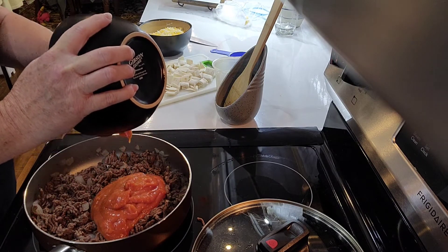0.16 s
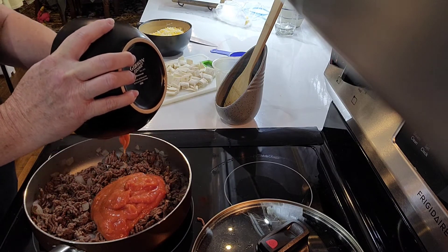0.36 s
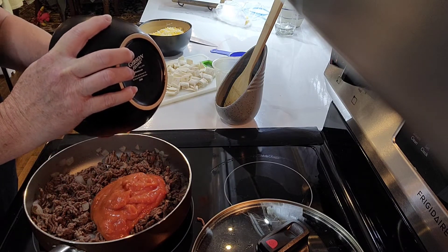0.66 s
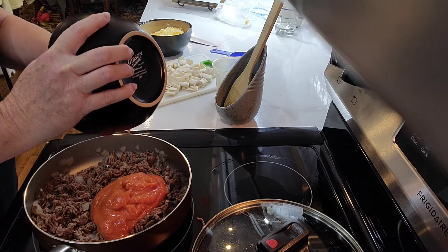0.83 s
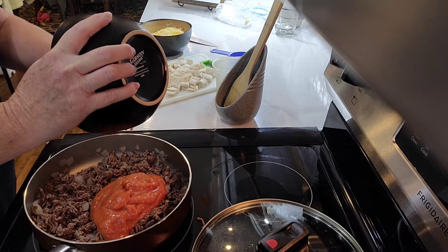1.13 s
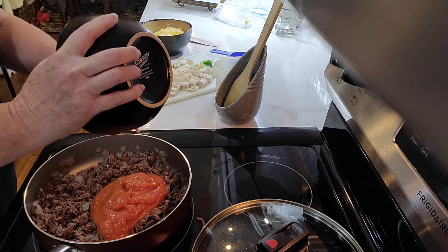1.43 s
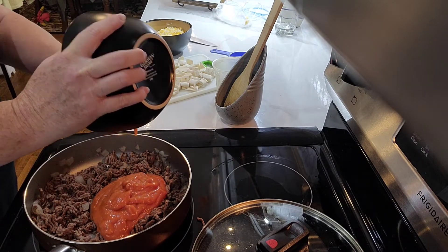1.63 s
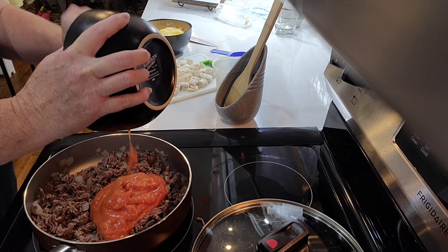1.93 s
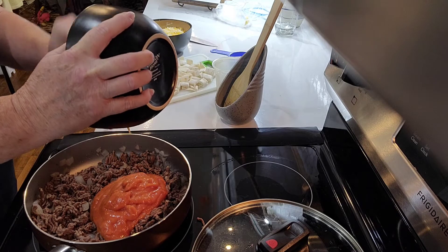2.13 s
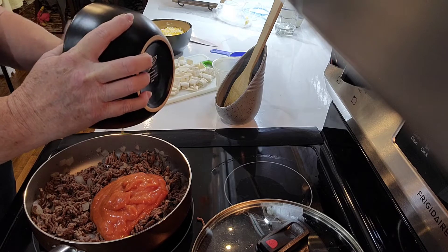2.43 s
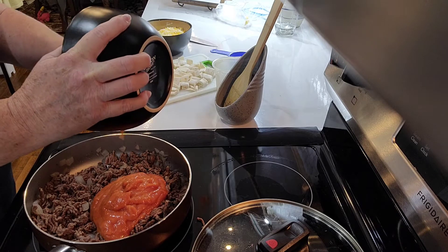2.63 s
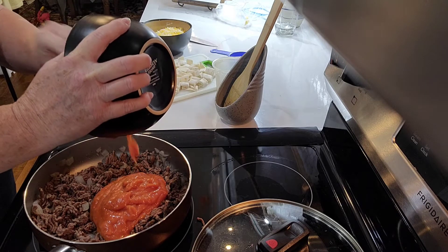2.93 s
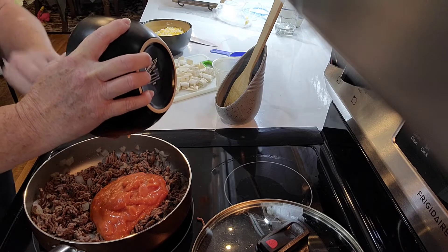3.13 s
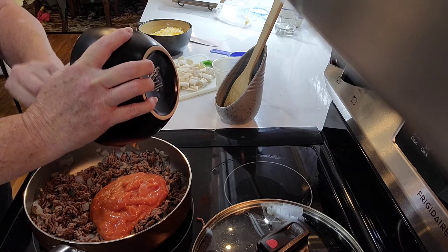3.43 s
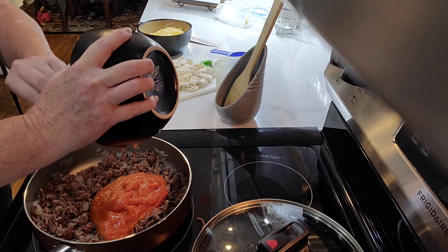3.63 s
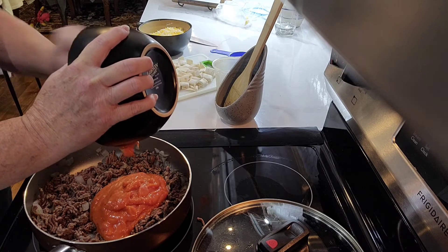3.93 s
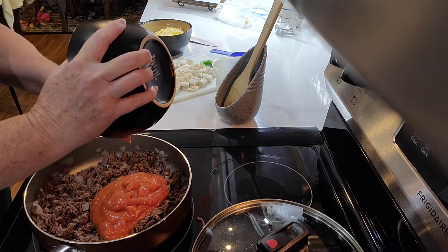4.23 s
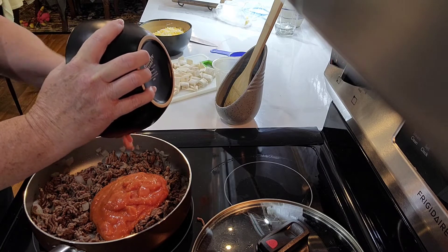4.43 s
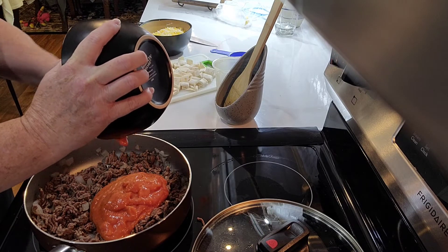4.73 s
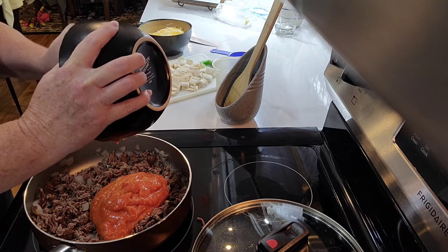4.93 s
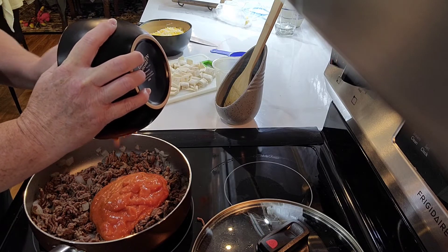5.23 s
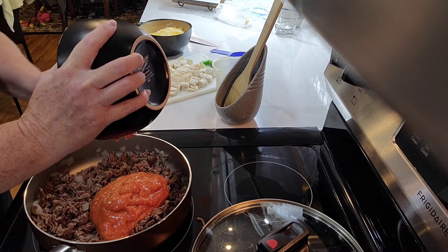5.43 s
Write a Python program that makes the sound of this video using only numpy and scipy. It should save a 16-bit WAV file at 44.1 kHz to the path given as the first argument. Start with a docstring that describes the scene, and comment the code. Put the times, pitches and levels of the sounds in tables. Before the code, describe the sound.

Close stereo sound of a spoon working inside a hollow ceramic pot. Quick scratchy drags, some chirping or squeaking, come between hard wall clacks and brighter bottom clinks. The first half is busy and uneven; later strokes fall roughly three times a second, and two loud knocks come near five seconds. A short kitchen reverberation follows each contact over very low, constant hiss.

```python
"""A short scrape already under way opens the scene, over a faint steady hiss: a spoon in a glazed pot.
Knocks on the pot's wall or bottom follow, among further drags along the glaze that hiss or squeak.
Drags are sliding tones over grainy noise; knocks are decaying pot modes plus a burst of noise.
A hard kitchen answers both with a short tail of decaying noise; knocks towards the bottom also flutter.
The pot is held tilted over a stove while the spoon scrapes thick sauce out of it."""
import sys
import numpy as np
from scipy import signal
from scipy.fft import rfft, irfft, next_fast_len
from scipy.io import wavfile
from scipy.ndimage import map_coordinates

SR = 44100
rng = np.random.default_rng(int(sys.argv[2]) if len(sys.argv) > 2 else 0)


def dump(signal):
    """Clip the signal to [-1, 1] and save it as 16-bit WAV at the path in sys.argv[1]."""
    limited = np.clip(np.atleast_2d(signal).T, -1, 1)
    pcm = np.round(limited * 32767).astype(np.int16)
    wavfile.write(sys.argv[1], SR, pcm)


N = 245637


def amp(db):
    """Decibels to gain."""
    return 10 ** (np.asarray(db) / 20)


def unit(x):
    """Scale to rms 1."""
    return x / np.sqrt(np.mean(x ** 2) + 1e-20)


def fade(t, t60):
    """Exponential decay, 60 dB down after t60 seconds."""
    return np.exp(-np.log(1000) * t / np.maximum(t60, 1e-3))


def along(points, hz):
    """Read (frequency, value) points on a log-frequency axis."""
    point_hz, values = np.transpose(points)
    return np.interp(np.log(hz + 1), np.log(point_hz + 1), values)


def wobble(rate, n):
    """A smooth random curve of n samples, rate knots a second."""
    knots = rng.standard_normal(int(n * rate / SR) + 4)
    return map_coordinates(knots, [np.arange(n) * rate / SR])


def filtered(x, response):
    """Multiply the spectrum of x by a response of frequency."""
    n = x.shape[-1]
    m = next_fast_len(n + 4096)
    hz = np.fft.rfftfreq(m, 1 / SR)
    return irfft(rfft(x, m) * response(hz), m)[..., :n]


def half_angle(alike, hz):
    """Half the left-right phase angle whose cosine is the likeness of the two sides."""
    return np.arccos(np.clip(along(alike, hz), -1, 1)) / 2


def spread(pair, spectrum, alike):
    """Colour two unrelated signals and mix them to left and right, at rms 1."""
    def middle_and_side(hz):
        turn = half_angle(alike, hz)
        return amp(along(spectrum, hz)) * [np.cos(turn), np.sin(turn)]
    mid, side = filtered(pair, middle_and_side)
    return unit(np.array([mid + side, mid - side]))


def panned(x, db):
    """Make the left side db louder than the right."""
    return x * amp([[db / 2], [-db / 2]])


def add(track, s, x):
    """Mix x into track from time s."""
    i = round(s * SR)
    x = x[:, max(-i, 0):N - i]
    track[:, max(i, 0):][:, :x.shape[1]] += x


# colour of the steady hiss: (pitch_hz, density_db per Hz, relative)
HISS_COLOUR = [(15, -40), (25, -7.5), (326, -5), (659, -4.5), (1330, -1.5), (1840, -2.5), (3080, 2.5),
               (4140, -3), (4870, 1.5), (5880, -3.5), (7310, -4.5), (9320, 0), (11900, -9), (14800, -0.5),
               (16000, -45)]
# how alike the hiss is on the two sides: (pitch_hz, likeness -1 to 1)
HISS_LIKENESS = [(60, 0.12), (180, 0.88), (550, 0.72), (1650, 0.21), (4970, -0.068), (15000, 0.2)]


def background():
    """Kitchen hiss: coloured noise with a fine wavering level, over a narrow low hum of filtered noise."""
    wavering = rng.standard_normal((2, N)) * amp(0.28 * wobble(1300, N))
    hiss = spread(wavering, HISS_COLOUR, HISS_LIKENESS)
    hum_colour = [(150, -51), (280, -49), (335, -22), (400, -35), (700, -103)]  # (pitch_hz, density_db)
    hum = spread(rng.standard_normal((2, N)), hum_colour, [(300, 0.98)])
    return amp(-58.0) * hiss + amp(-77.5) * hum


# colour of the grainy rasp: (pitch_hz, density_db per Hz, relative)
RASP_COLOUR = [(350, -57), (600, -26), (768, -12), (944, -76), (1210, -17), (2240, -30), (3160, -14.5),
               (4520, -5), (5120, -1.5), (6290, -23), (7310, -6), (10700, -21.5), (13200, -10.5),
               (16000, -32)]
# how alike spoon sounds are on the two sides: (pitch_hz, likeness -1 to 1)
SPOON_LIKENESS = [(400, 0.88), (1200, 0.86), (2600, 0.59), (4800, -0.49), (7500, 0.18), (14000, -0.14)]


def drag(start, crest, end, from_hz, to_hz, squeak_db, half_db, rasp_db):
    """The spoon sticks and slips: a rough gliding squeak with its octave and half pitch, over a grainy rasp."""
    n = int((end - start) * SR)
    t = start + np.arange(n) / SR
    pressure = np.interp(t, [start, crest, end], [0, 1, 0])
    slips = unit(amp(2.6 * wobble(170, n)))
    pitch = np.linspace(from_hz, to_hz, n) * (1 + .012 * wobble(200, n))
    phase = 2 * np.pi * np.cumsum(pitch) / SR + np.array([[.6], [-.6]])  # left leads right

    # uneven slips smear the squeak into a narrow band with wide skirts
    def smear(rate):
        return wobble(rate, n) + 1j * wobble(rate, n)
    core = .68 + .46 * smear(260)
    skirts = .18 * smear(1300)
    tone_and_octave = np.exp(1j * phase) + amp(-13) * np.exp(2j * phase)
    squeak = amp(squeak_db) * (core + skirts) * tone_and_octave
    groan = amp(half_db) * core * np.exp(.5j * phase)
    grains = rng.standard_normal((2, n)) * amp(4.5 * wobble(2500, n))
    rasp = amp(rasp_db - 7.5) * spread(grains, RASP_COLOUR, SPOON_LIKENESS)
    return pressure * slips * (1.156 * np.real(squeak + groan) + rasp)


def detuned_db(hz, centre_hz, reach_hz):
    """Loss away from a resonance: 1 dB at reach_hz, growing with the square of the distance."""
    return -((hz - centre_hz) / reach_hz) ** 2


CREST_SHARE = 0.57  # how far into a drag the pressure peaks
# a squeak on this wall mode also wakes the next one up
TWIN_NEAR_HZ, TWIN_RATIO, TWIN_DB, TWIN_REACH_HZ = 2510, 1.22, 1.5, 44.8
# the half pitch speaks when it falls near a low wall mode
HALF_NEAR_HZ, HALF_DB, HALF_REACH_HZ = 1695, -4.5, 50
SILENT_DB = -120


def stroke(start, end, from_hz, to_hz, squeak_db, rasp_db):
    """One drag; its pitch sets how strongly the pot adds a half pitch below and a twin squeak above."""
    crest = start + CREST_SHARE * (end - start)
    hz = (from_hz + to_hz) / 2
    half_db = squeak_db + HALF_DB + detuned_db(hz / 2, HALF_NEAR_HZ, HALF_REACH_HZ)
    twin_db = squeak_db + TWIN_DB + detuned_db(hz, TWIN_NEAR_HZ, TWIN_REACH_HZ)
    main = drag(start, crest, end, from_hz, to_hz, squeak_db, half_db, rasp_db)
    twin = drag(start, crest, end, TWIN_RATIO * from_hz, TWIN_RATIO * to_hz, twin_db, SILENT_DB, SILENT_DB)
    return main + twin


# modes of the pot, strengths relative: (pitch_hz, width_hz, wall_db, bottom_db)
POT_MODES = [ (766.3, 47, -37.5, -10), (1051, 17, -19.5, -40), (1203.4, 26, -13.5, -43),
             (1432, 92, -14, -13), (1735, 77, -18, -21), (1866, 52, -10.5, -20), (2550, 200, -11, -46),
             (2749, 54, -14.5, -37), (3111, 134, -17, -0.5), (3490, 75, -18, -4), (3660, 115, -5, -10),
             (4420, 72, -15, -19), (4674, 75, -6, -29), (4837, 94, -11, 1), (4901, 46, -12.5, -2),
             (5120, 120, -12, -4), (7070, 33, -20, -29), (7370, 59, -29, -6), (8030, 76, -12.5, -19),
             (8710, 90, -18, -17), (9725, 95, -13, -19), (10300, 55, -20, -23), (11530, 39, -15, -18.5),
             (12300, 160, -8.5, -9), (12900, 120, -17, -13), (13200, 120, -12, -5)]


def through_pot(x, gain_db):
    """A drag also sets the wall's modes ringing: a bank of resonances added to the direct sound."""
    def modes(f):
        return sum(amp(wall_db) * 1j * f * width / (hz * hz - f * f + 1j * f * width)
                   for hz, width, wall_db, _ in POT_MODES)
    with_room_to_ring = np.pad(x, ((0, 0), (0, SR // 20)))
    return filtered(with_room_to_ring, lambda f: 1 + amp(gain_db) * modes(f))


# length of the room's tail: (pitch_hz, t60_s)
KITCHEN_T60 = [(300, 0.17), (1200, 0.37), (3000, 0.29), (5000, 0.26), (9000, 0.29), (15000, 0.2)]
# colour of the room's tail: (pitch_hz, gain_db)
KITCHEN_COLOUR = [(400, 4), (1100, 1.5), (1900, 0), (2750, 7), (3900, 0.5), (4850, 7), (6000, 1),
                  (7500, 1.5), (13000, 3.5)]


def kitchen(x):
    """Diffuse answer of the room: decaying coloured noise, drawn anew for each contact, convolved with x."""
    hz, t, z = signal.stft(rng.standard_normal((2, SR // 2)), SR, nperseg=256)
    build_up = 1 - np.exp(-t / 0.00067)
    shaped = z * fade(t, along(KITCHEN_T60, hz)[:, None]) * build_up
    tail = signal.istft(shaped, SR, nperseg=256)[1]
    tail = filtered(tail / np.linalg.norm(tail[0]), lambda f: amp(along(KITCHEN_COLOUR, f)))
    return signal.fftconvolve(x, tail, axes=1)


# drags along the glaze, levels before pressure, pot and pan:
# (start_s, end_s, start_pitch_hz, end_pitch_hz, squeak_db, rasp_db)
GLAZE_DRAGS = [ (-0.06, 0.057, 3150, 3200, -58, -45), (0.036, 0.107, 4160, 4400, -64, -41.5),
               (0.326, 0.392, 4200, 5110, -57, -41.5), (0.908, 1.001, 3300, 3100, -71, -49.5),
               (1.301, 1.371, 2690, 3520, -56, -48), (1.35, 1.396, 1880, 2454, -54.5, -47),
               (1.646, 1.737, 2440, 2964, -43.5, -47), (2.035, 2.132, 3700, 2430, -55, -47.5),
               (2.101, 2.126, 2930, 2820, -33.5, -47.5), (2.348, 2.431, 5400, 4350, -55, -38.5),
               (2.614, 2.697, 5300, 3660, -68, -40.5), (2.886, 2.943, 3400, 3000, -57, -60),
               (3.174, 3.237, 2500, 2652, -45.5, -52), (3.481, 3.54, 2470, 2650, -44.5, -48),
               (3.746, 3.825, 2570, 2510, -47.5, -52), (3.818, 3.896, 2640, 2366, -52.5, -51),
               (3.865, 3.899, 3570, 3140, -48.5, -48), (4.188, 4.268, 3235, 3350, -49.5, -51),
               (4.497, 4.587, 2680, 2470, -46.5, -48), (4.805, 4.852, 3420, 3340, -55, -45),
               (5.11, 5.19, 2900, 3170, -49.5, -44), (5.424, 5.53, 3660, 3017, -50, -51)]


def drags():
    """All drags: friction sound coloured by the pot, each with the room's answer."""
    out = np.zeros((2, N))
    for row in GLAZE_DRAGS:
        x = amp(1.0) * panned(through_pot(stroke(*row), gain_db=13.0), db=2.5)
        add(out, row[0], x)
        add(out, row[0], amp(-11.5) * kitchen(x))
    return out


def ring(t, depth, tonk_hz, tonk_db, free_db, free_t60):
    """The pot's modes at new strengths: damped under the spoon, then ringing on faintly."""
    hz, width, wall_db, bottom_db = np.transpose(POT_MODES)[:, :, None]
    size, phase, lead, load = rng.standard_normal((4, len(POT_MODES), 1))
    scatter = amp(3 * size)
    # a blow favours the low mode whose antinode it lands on
    favoured = amp(tonk_db * np.exp(-((hz - tonk_hz) / 100) ** 2))
    by_place = (1 - depth) * amp(wall_db) + depth * amp(bottom_db)
    strength = scatter * favoured * by_place * np.sqrt(width)
    damped = np.exp(-np.pi * width * t)
    free = amp(free_db) * fade(t, free_t60 * (hz / 1000) ** -.6)  # free_t60 holds at 1 kHz
    # hand, spoon and sauce load the pot differently at each blow
    hz = hz * (1 + .008 * load)
    # each mode reaches left and right at its own phase
    lag = np.sign(lead) * half_angle(SPOON_LIKENESS, hz)

    def side(shift):
        return (strength * (damped + free) * np.sin(2 * np.pi * (hz * t + phase) + shift)).sum(0)
    return np.array([side(lag), side(-lag)])


# colour of the dense clatter of spoon and pot: (pitch_hz, density_db per Hz, relative)
CLATTER_COLOUR = [(130, -4.5), (600, -14), (1150, -3), (1800, 8), (2200, -11.5), (2700, -5), (4200, 7),
                  (4900, -34), (5500, 4), (6200, -1), (7500, -1), (12800, -10), (14500, -1.5), (16000, -14)]
# body, clack, clink and tick of a contact: (from_hz, to_hz)
CONTACT_ZONES = [(400, 2200), (2200, 4200), (4200, 6000), (6000, 16000)]


def knock(depth, tonk_hz, tonk_db, levels_db, t60, clatter_db):
    """One contact: the pot's modes plus dense decaying noise, levelled zone by zone."""
    t = np.arange(SR // 4) / SR
    pot = ring(t, depth, tonk_hz, tonk_db, free_db=-19, free_t60=0.11)
    noise = spread(rng.standard_normal((2, len(t))), CLATTER_COLOUR, SPOON_LIKENESS)
    clatter = unit(noise * fade(t, t60))
    swell = 1 - np.exp(-t / .0017)  # the sound takes a moment to leave the pot
    blow = (pot + amp(clatter_db) * clatter) * swell
    out = 0
    for zone, db in zip(CONTACT_ZONES, levels_db):
        band = signal.butter(2, zone, "band", fs=SR, output="sos")
        part = signal.sosfilt(band, blow)
        out = out + amp(db) * part / np.std(part[:, :SR // 50])  # levels hold for the first 20 ms
    return out


WALL_TONK_HZ, BOTTOM_TONK_HZ = 1137, 768  # the low mode that a blow favours
TONK_DB, TONK_GAIN = 4.5, 0.58  # lift of that mode; more dB for each dB of hollowness
WALL_CLATTER_S, BOTTOM_CLATTER_S = 0.039, 0.082  # t60 of the clatter
CLATTER_DB, CLATTER_LOSS = -4.5, 0.67  # clatter beside the modes; dB lost for each dB of hollowness
# the wall clacks, the bottom clinks; one row each for body, clack, clink and tick: (wall_db, bottom_db)
PLACE_WEIGHTS = [(-7.5, -6.5), (1, 1), (-1, 11.5), (1.5, 6.5)]


def strike(depth, level_db, sharp_db, hollow_db):
    """Depth sets colour, low note and length; the spoon's edge adds tick, a square blow body and less clatter."""
    wall_db, bottom_db = np.transpose(PLACE_WEIGHTS)
    place_db = (1 - depth) * wall_db + depth * bottom_db
    levels_db = level_db + place_db + np.array([hollow_db, 0, 0, sharp_db])
    tonk_hz = BOTTOM_TONK_HZ if depth > .5 else WALL_TONK_HZ
    tonk_db = TONK_DB + TONK_GAIN * hollow_db
    t60 = np.interp(depth, [0, 1], [WALL_CLATTER_S, BOTTOM_CLATTER_S])
    return knock(depth, tonk_hz, tonk_db, levels_db, t60, CLATTER_DB - CLATTER_LOSS * hollow_db)


def add_flutter(track, s, x, gap, first_db, loss_db, count):
    """The pot's mouth beams the bottom's clink outward; it bounces between facing surfaces."""
    clink_band = signal.butter(1, (4200, 5600), "band", fs=SR, output="sos")
    beam = signal.sosfilt(clink_band, x)
    for k in range(count):
        add(track, s + (k + 1) * gap, amp(first_db - k * loss_db) * beam)


FLUTTER_GAP_S = .0236
KNOCK_PAN_DB = 2  # left over right
WALL_ROOM_DB, BOTTOM_ROOM_DB = -9.5, -11.5  # a blow near the mouth throws more into the room
# spoon contacts, level before the place weights and pan:
# (start_s, depth 0 wall to 1 bottom, level_db, sharpness_db, hollowness_db)
SPOON_KNOCKS = [ (0.128, 0.32, -30.5, 2, 2), (0.158, 0, -42.5, -20, -8), (0.281, 0.69, -35.5, 1.5, -2.5),
                (0.514, 0.67, -41.5, 0.5, -1.5), (0.603, 0, -26.5, 4, -0.5), (0.808, 0.28, -27.5, 0.5, 0),
                (1.226, 0, -32.5, 1.5, 1), (1.397, 0, -49.5, -12, -4), (1.567, 0, -40.5, -6, 2),
                (1.933, 0.59, -36, -2.5, -1), (1.968, 0.13, -43, -4, 1.5), (2.288, 0.76, -31.5, -1, -3),
                (2.407, 0.48, -41, -5, 1), (2.428, 0.33, -39.5, 0.5, -2.5), (2.573, 0.7, -34.5, -2, -3.5),
                (2.688, 0.33, -41, -2, -0.5), (2.758, 0.99, -35.5, -0.5, -3), (3.063, 0.79, -48, 0, 11),
                (3.407, 0.29, -33, 3, 2.5), (3.689, 0.14, -26, 1.5, 1), (4.041, 0.19, -30, 2, -2),
                (4.412, 0.88, -41, 8, 0), (4.457, 0.38, -40, -1.5, -2), (4.735, 0.0088, -21, -4.5, 1.5),
                (5.001, 0, -19.5, -3, -1.5), (5.371, 0.035, -29.5, -1.5, 0)]


def knocks():
    """All knocks, each with the room's answer and a flutter that grows with depth."""
    out = np.zeros((2, N))
    for s, depth, level_db, sharp_db, hollow_db in SPOON_KNOCKS:
        x = panned(strike(depth, level_db, sharp_db, hollow_db), KNOCK_PAN_DB)
        room_db = np.interp(depth, [0, 1], [WALL_ROOM_DB, BOTTOM_ROOM_DB])
        add(out, s, x)
        add(out, s, amp(room_db) * kitchen(x))
        add_flutter(out, s, depth * x, FLUTTER_GAP_S, first_db=-7, loss_db=11, count=3)
    return out


def scene():
    """Spoon and pot in the quiet kitchen."""
    return background() + drags() + knocks()


TOP_HZ = 16100


def record(dry):
    """Keep nothing at or above the band limit."""
    return filtered(dry, lambda hz: hz < TOP_HZ)


dry = scene()
out = record(dry)
dump(out)
```